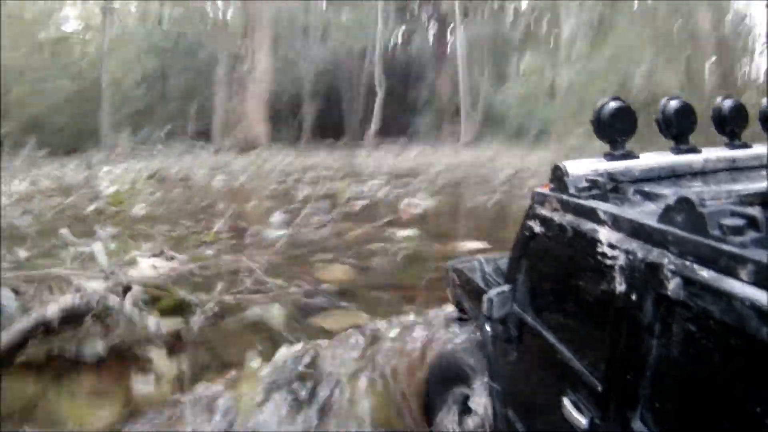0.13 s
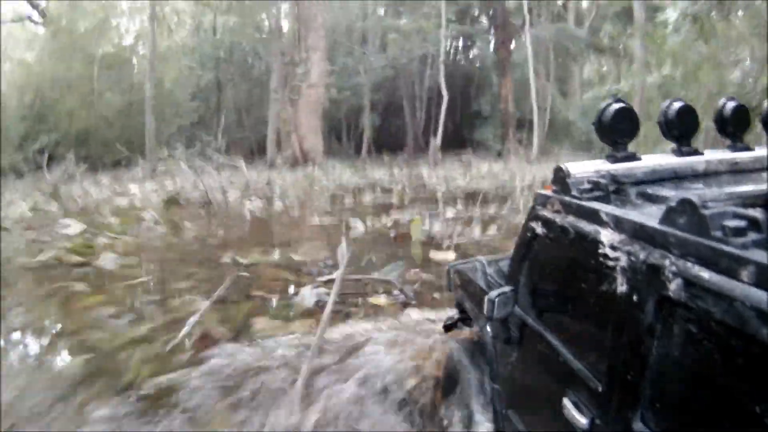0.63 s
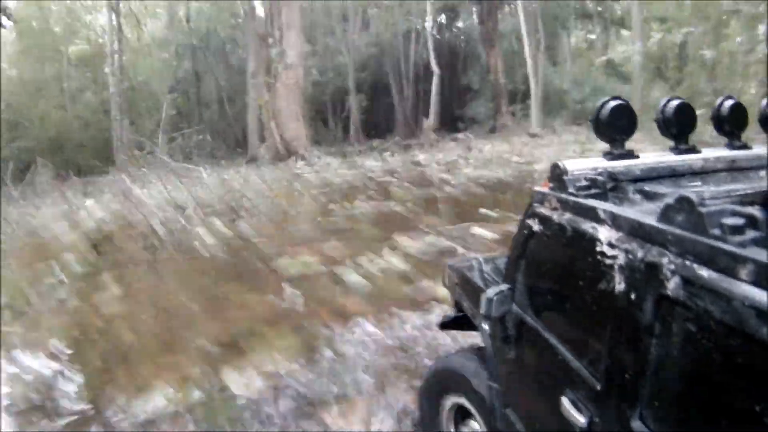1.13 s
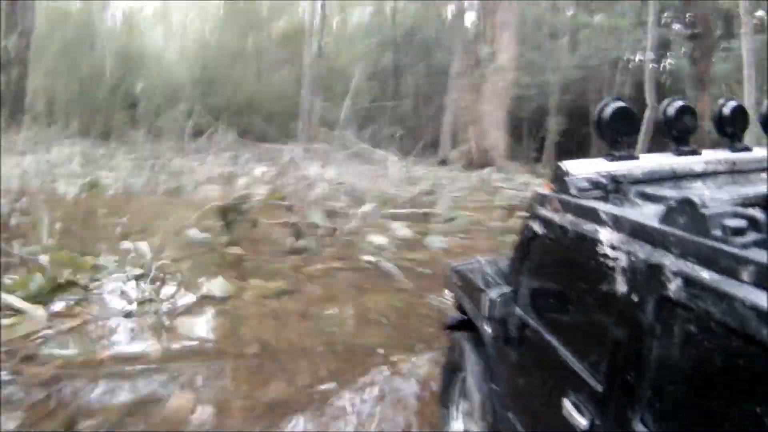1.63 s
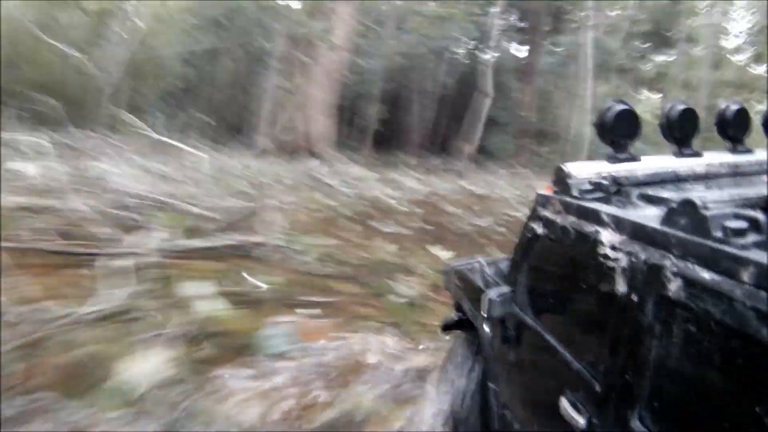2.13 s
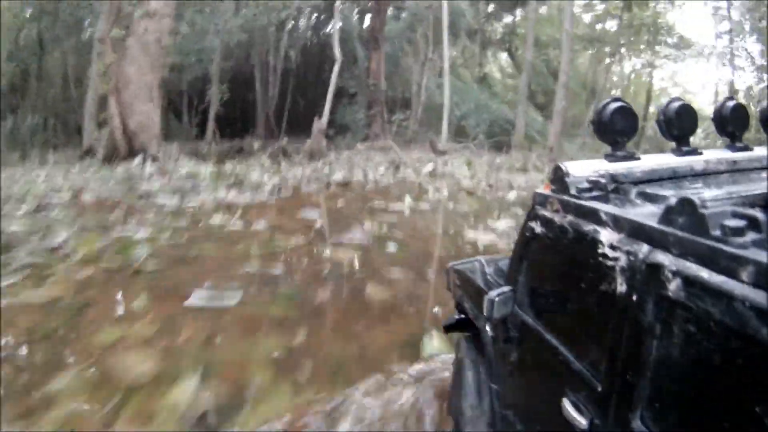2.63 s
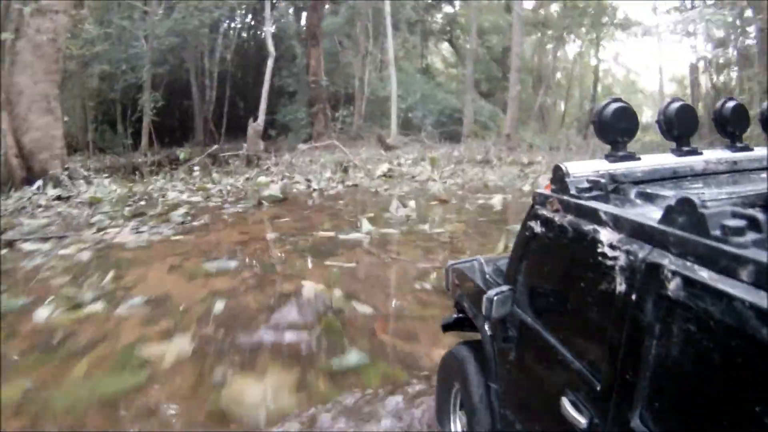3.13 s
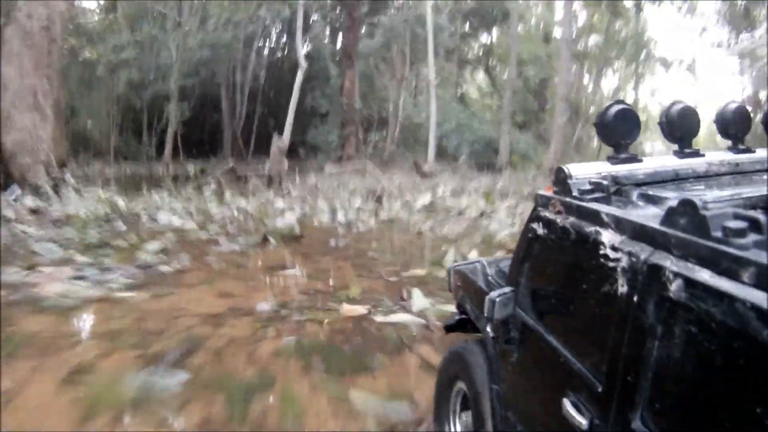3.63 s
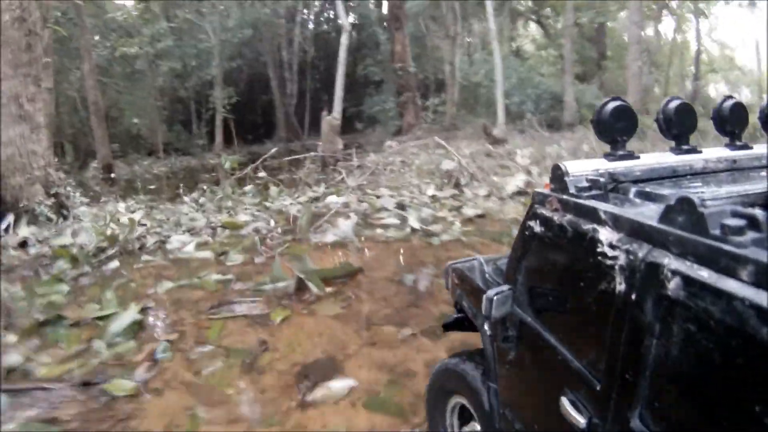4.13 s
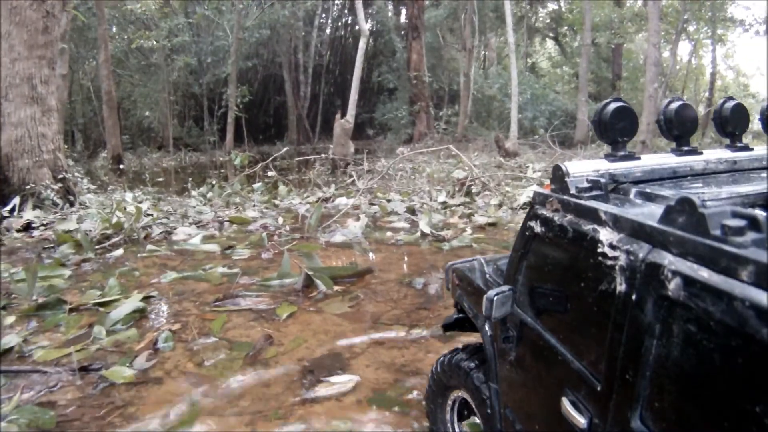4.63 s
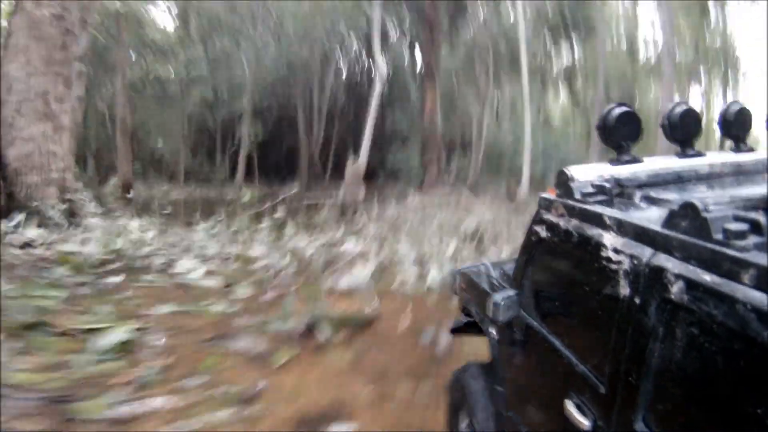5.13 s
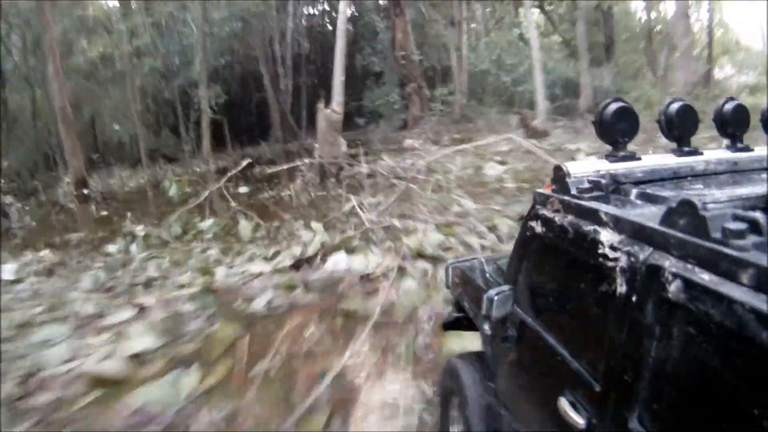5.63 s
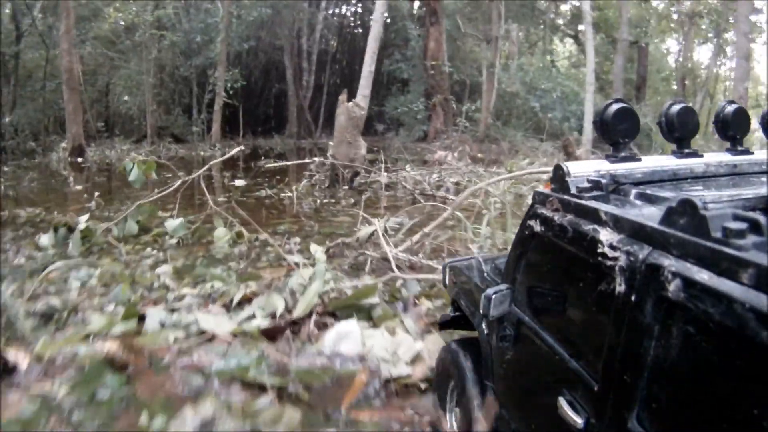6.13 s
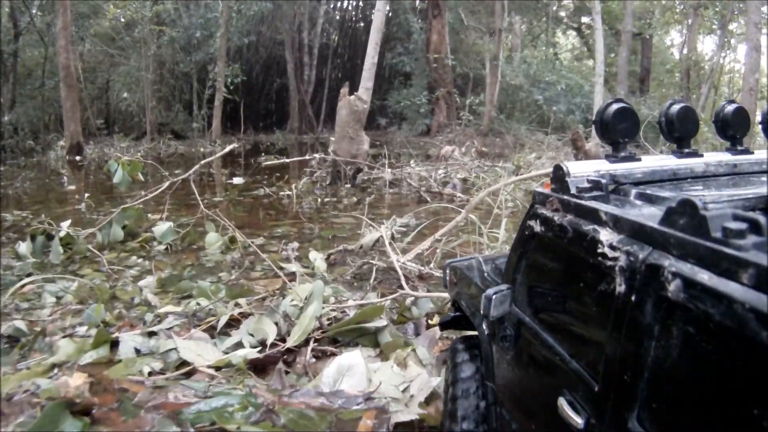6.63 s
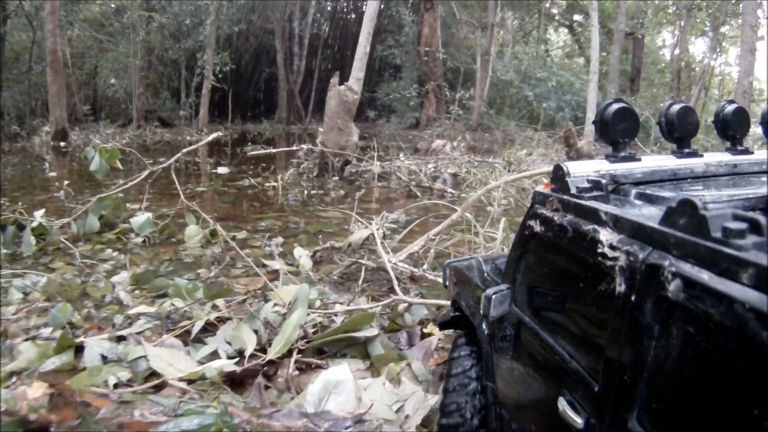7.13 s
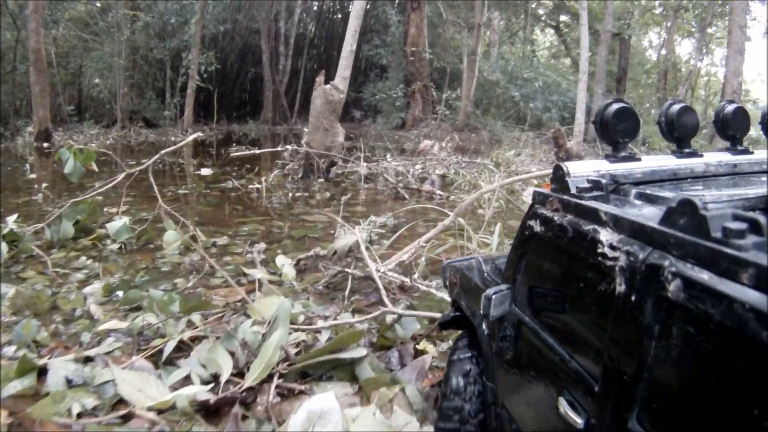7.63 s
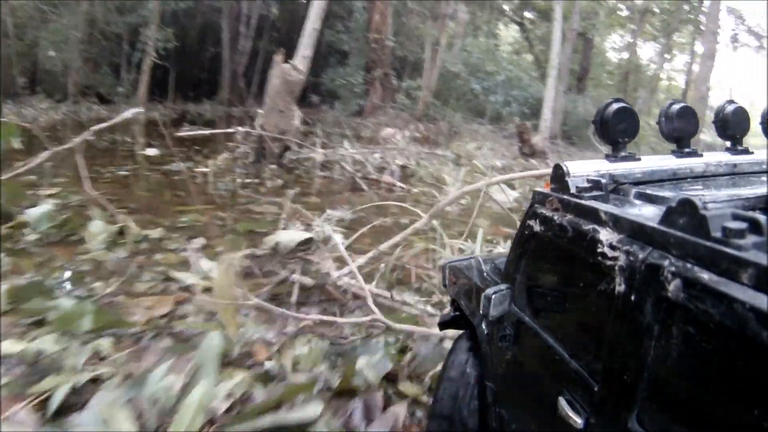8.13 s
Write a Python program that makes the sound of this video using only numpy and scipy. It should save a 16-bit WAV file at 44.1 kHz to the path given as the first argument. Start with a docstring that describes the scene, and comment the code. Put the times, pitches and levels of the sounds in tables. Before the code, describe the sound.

A small electric crawler whines and rattles through a puddle and wet leaves, with splashes and knocks, pauses, lurches with a hard bang, then nearly stops.

```python
"""Wet churning and rattling, a wavering gear whine, knocks, splashes, short squeals and low thuds of a swaying arm:
a small electric crawler drives through a puddle and wet leaves, heard from a closed camera case on its body.
Water and twigs strike the plastic shell, whose modes ring; gears are mesh tones through the same shell.
Drops are short noise bursts, the camera arm is narrow low noise, squeals and servo are plain tones.
The cheap recorder takes 12000 samples a second and holds each one, which mirrors the sound into the treble."""
import sys
import numpy as np
from scipy import signal
from scipy.fft import rfft, irfft, next_fast_len
from scipy.io import wavfile
from scipy.ndimage import uniform_filter1d

SR = 44100
rng = np.random.default_rng(int(sys.argv[2]) if len(sys.argv) > 2 else 0)


def volts_from_decibels(level):
    """Turn decibel levels (scalar or array-like) into linear amplitude factors."""
    exponent = np.asarray(level, float) / 20
    return 10 ** exponent


def master(y):
    """Save y as 16-bit WAV."""
    cut = np.clip(np.atleast_2d(y).T, -1, 1)
    pcm = np.round(cut * 32767)  # scale
    wavfile.write(sys.argv[1], SR, pcm.astype(np.int16))


N = 364707
TIME_S = np.arange(N) / SR

# Woods and electronics at rest. Each row: frequency in Hz, relative density in dB per Hz.
HUSH_COLOUR = [(47, -47), (80, -10), (174, -16.5), (605, -26.5), (868, -26), (1080, -45), (1520, -28.5),
               (3680, -37.5), (6000, -39), (7800, -76), (13200, -120)]
HUSH_RMS_DB = -63.5
# Steering servo holding the wheels. Each row: start in seconds, length in seconds, level in dB.
SERVO_HOLDS = [(5.085, 0.14, -74.5), (6.32, .15, -74), (6.55, 1.42, -76)]
SERVO_HZ = 5954
# Camera arm resonances: slow rock, bounce, flutter. Each row: frequency in Hz, width in Hz.
ARM_MODES = [(21, 18), (56, 12.6), (136, 32.2)]
# Bumps under the wheels shake the arm. Each row: time in seconds, slow rock in dB, bounce in dB, flutter in dB.
ARM_BUMPS = [(0, -20, -26.5, -36.5), (.16, -32, -21, -32.5), (.5, -22.5, -29.5, -39.5),
             (.68, -30.5, -31, -43), (.85, -25.5, -31.5, -37.5), (1.0, -32, -29, -54.5),
             (1.17, -27.5, -31.5, -41), (1.33, -35, -25, -65), (1.48, -19, -23.5, -36),
             (1.83, -20, -19, -38.5), (2.1, -20, -24.5, -36.5), (2.401, -22, -29.5, -40.5),
             (2.65, -22.5, -34, -38.5), (2.92, -28, -20.5, -43.5), (3.15, -29.5, -31.5, -49),
             (3.4, -25.5, -21, -42), (3.72, -27, -28, -44.5), (3.87, -28.5, -30, -46),
             (4.03, -38, -29.5, -55), (4.3, -31, -41, -50), (4.55, -43.5, -55.5, -70.5),
             (4.85, -47, -50, -81), (5.0, -82, -78, -87), (5.22, -32, -30, -44.5),
             (5.371, -22, -25.5, -31.5), (5.53, -44, -27.5, -68), (5.63, -21.5, -24.5, -39),
             (5.74, -48, -41, -40), (5.85, -22.5, -26.5, -45), (6.1, -42, -36.5, -52.5),
             (6.251, -33, -57, -53.5), (6.35, -54, -48, -58), (6.521, -41, -46, -52), (6.8, -61, -38, -56),
             (6.989, -39, -43, -58), (7.15, -47, -46, -51.5), (7.402, -48, -53.5, -65),
             (7.598, -57, -43.5, -56), (7.801, -50.5, -48, -52), (8.05, -35.5, -39, -47),
             (8.26, -40, -32, -60)]
BUMP_RISE_S, BUMP_FALL_S = 0.075, 0.13
# Drops on the camera case. Each row: start in seconds, strength in dB ahead of DROP_GAIN_DB.
CASE_DROPS = [(0.893, -31), (1.0273, -36), (1.044, -26), (1.7679, -32), (2.033, -35), (2.1325, -38),
              (2.2267, -32), (2.3456, -39), (2.4026, -33), (2.7152, -35), (2.768, -43), (2.832, -34),
              (2.8779, -34), (2.9083, -37), (3.3702, -37), (3.5228, -34), (3.5832, -39), (3.8082, -33),
              (3.976, -38), (4.315, -62), (5.2285, -31), (5.544, -27), (5.654, -35), (6.099, -38),
              (6.17, -52), (8.0634, -40)]
DROP_GAIN_DB, DROP_DECAY_S = 8.0, 0.0016
PATTER_DB, PATTER_PER_S = -25.5, 170  # small drops: median strength re contact level, rate
# Falling squeals as the wheels slip and the gears slow. Each row: start in seconds, start pitch in Hz, level in dB.
SLIP_SQUEALS = [(3.998, 966, -27), (4.1, 904, -30), (5.97, 950, -23.5), (6.09, 735, -35.5),
                (6.259, 918, -30.5), (6.42, 914, -36), (6.5, 898, -42), (6.55, 707, -46)]
SLIP_S, SLIP_SAG_SHARE = .07, .11  # length, share of pitch lost
# Shell resonances. Each row: frequency in Hz, width in Hz, relative gain in dB.
SHELL_MODES = [(280, 12, -20), (412, 32.5, -12.5), (660.4, 27.3, 2), (899.2, 45.8, 5), (1072, 28.6, 3.5),
               (1210, 122, -2), (1503.6, 95.3, 0.5), (1640, 214, -5.5), (1850, 280, -7), (2056, 56, -7),
               (2256, 129, -8.5), (2450, 154, -10.5), (2902, 240, -20.5), (3368, 170, -19.5),
               (3708, 118, -14), (4360, 100, -26.5), (4930, 970, -35.5)]
# Twigs and stones against the shell; near 4.7-4.9 s faint pitched blips, perhaps a bird or the motor.
# Each row: start in seconds, strength in dB, pitch in Hz, high modes in dB.
SHELL_KNOCKS = [(0.741, -17, 1470, -28), (0.841, -16, 1450, -28), (1.029, -3, 1905, -34),
                (1.044, -21, 1850, -4.5), (1.278, -21.5, 910, 1), (1.704, -17.5, 1467, -15),
                (2.083, -35, 1340, -29), (2.163, -11, 841, -10.5), (2.219, -14.5, 1365, -20),
                (3.435, -20, 890.4, -30), (3.608, -17, 1443, -39), (3.669, -14, 1542, -23),
                (4.003, -24, 850, -30), (4.063, -18.5, 1498, -18), (4.134, -25, 864, -57),
                (4.189, -18.5, 853, -33), (4.459, -48, 1510, -28), (4.725, -51, 875, -20),
                (4.792, -61, 1500, -20), (4.872, -51, 1510, -20), (5.097, -47, 893, -21),
                (5.128, -33, 893, -21), (5.211, -16.5, 1410, -13), (5.23, -18.5, 1760, -9),
                (5.65, 8, 1247, -21.5), (5.746, -12, 1420, -22), (6.097, -14, 1900, 5),
                (6.129, -33.5, 900, 12.5), (6.171, -1, 2214, -17), (6.248, -17.5, 2280, -30),
                (6.395, -29, 915, -26), (6.498, -32, 833, -30), (6.605, -38, 860, -34),
                (6.77, -47.5, 955, -30), (6.89, -41, 1520, -34), (6.958, -29, 1770, -3.5),
                (7.009, -40, 1450, -15), (7.049, -39.5, 1280, -10), (7.403, -40.5, 1930, -22),
                (7.709, -44, 970, -8), (7.93, -40, 900, -20)]
RING_S, RING_SLOPE = .06, 1.1  # t60 at 1 kHz ahead of extra damping; higher spots die faster by this power
HARD_BLOW_DB = 1  # blows near this strength are damped by what struck them
# Gear teeth meeting, one list for each spell of driving.
# Each row: time in seconds, mesh rate in Hz ahead of sag and waver, drive in dB.
MESH_SPELLS = [
    [(0, 2630, -24.5), (.28, 3065, -18.5), (.55, 3000, -22.5), (.68, 2600, -22.5), (.85, 2330, -31.5),
     (1.06, 1950, -21.5), (1.25, 1991, -24.5), (1.45, 2030, -23), (1.68, 2030, -26), (1.85, 2310, -32.5),
     (2.28, 2050, -31.5), (2.45, 2270, -29.5), (2.56, 2114, -27), (2.66, 2302, -30.5), (2.8, 2124, -25),
     (2.95, 2010, -31), (3.06, 1816, -28), (3.18, 1590, -37), (3.3, 1530, -28.5), (3.58, 1573, -28.5),
     (3.65, 1930, -23.5), (3.72, 2450, -28.5), (3.84, 2850, -27), (3.95, 2260, -56), (4.1, 1651, -29),
     (4.3, 1494, -44.5)],
    [(5.17, 1105, -52), (5.2, 1295, -35), (5.22, 1800, -19), (5.25, 1894, -24.5), (5.27, 2260, -25),
     (5.3, 2510, -27), (5.33, 3200, -19), (5.38, 3907, -35)],
    [(7.93, 620, -49), (8.02, 688, -41), (8.06, 875, -37), (8.1, 1060, -46), (8.18, 1104, -51),
     (8.27, 1150, -38)],
]
PINION_TEETH = 13
# Load on the gears dips the pitch briefly, about once per wheel turn.
# Each row: time in seconds, share of rate lost.
GEAR_SAGS = [(.12, 0.064), (.44, 0.11), (.64, .08), (.8, .07), (.97, .08), (1.246, .09), (1.47, .08),
             (1.712, .1), (1.841, .1), (1.959, .1), (2.1, .08), (2.52, .08), (2.631, .08), (2.85, .07),
             (3.07, .07), (3.361, 0.058), (3.56, .05)]
SAG_S = .018
# Churn through water and leaves. Each row: time in seconds, contact level in dB, spray brightness in dB.
CHURN_COURSE = [(0, -23, -2.5), (.6, -25, 1), (1.0, -26, 1), (1.7, -26.5, -2), (2.1, -27, 0.5),
                (2.45, -26.5, 0), (3.1, -27, -3.5), (3.55, -29.5, -6), (3.8, -24.5, -0.5), (4.0, -30, -4),
                (4.3, -32.5, -15), (4.42, -49, -12), (4.56, -71, 17), (5.07, -80, 18.5), (5.1, -52.5, -41),
                (5.2, -28, -4), (5.33, -26.5, 1), (5.64, -26, 2), (5.72, -21, -2), (5.8, -17, -0.5),
                (5.93, -24.5, -1), (6.08, -28, -4), (6.22, -29, 0), (6.33, -33, -0.5), (6.45, -38.5, -1),
                (6.7, -56, -6), (6.85, -60.5, 4), (6.92, -54.5, 2), (7.1, -53, -3), (7.36, -61, 0),
                (7.55, -64.5, 9), (7.78, -44, -10.5), (7.9, -59, -12), (7.97, -42, -5.5), (8.27, -35, -3.5)]
RUMBLE_DB = -20.5  # re contact level
MID_SHARE = 0.44  # mids brighten by this share of the spray brightness
# Splashes and scrapes along the shell. Each row: start in seconds, length in seconds, level in dB.
SHELL_SPLASHES = [(0, 0.004, -22), (.742, 0.005, -21), (2.082, 0.004, -25), (2.15, 0.08, -26),
                  (3.668, 0.0048, -32), (4.006, 0.019, -47), (4.135, 0.017, -44), (4.187, 0.0097, -31.5),
                  (4.37, 0.017, -46), (4.724, .02, -63), (4.76, 0.116, -65), (5.208, 0.027, -30),
                  (5.31, 0.054, -29), (5.375, 0.017, -17), (5.4, .04, -10.5), (5.45, 0.033, -17),
                  (5.51, 0.0044, -17.5), (5.525, 0.049, -14.5), (5.61, 0.014, -28), (5.745, 0.01, -33),
                  (6.105, .03, -26), (6.185, .025, -21.5), (6.25, 0.031, -36.5), (7.16, 0.036, -57),
                  (7.32, .02, -56)]
SPLASH_ATTACK_S, SPLASH_RELEASE_S = 0.0057, 0.0044
SPLASH_LOW_DB, SPLASH_MID_DB, SPLASH_HIGH_DB = -1, 1.5, -1  # colour of a splash
# Wheels strain against branches, low shell modes hum. Each row: start in seconds, length in seconds, level in dB.
WHEEL_STRAINS = [(6.5, 1.357, -50), (7.96, .32, -42.5)]
CEILING_DB, RECOVERY_DB_PER_S, REACTION_S = -4, 20.5, 0.0029  # gain control
HELD_SAMPLES, TOP_HZ = 4, 15250  # recorder


def level(x, db):
    """Scale to an rms level."""
    return x * volts_from_decibels(db) / np.sqrt(np.mean(x ** 2))


def curves(tables):
    """Join tables end to end; one row of samples for each column after time."""
    s, *columns = np.concatenate(tables).T
    return [np.interp(TIME_S, s, column) for column in columns]


def walk(rate_hz):
    """Random levels held 1 / rate_hz seconds and slewed twice; spread 1."""
    k = int(SR / rate_hz)
    held = np.repeat(rng.standard_normal(N // k + 1), k)
    x = uniform_filter1d(uniform_filter1d(held, k), k)[:N]
    return x / x.std()


def band(x, lo_hz, hi_hz):
    """Band-pass."""
    return signal.sosfilt(signal.butter(2, [lo_hz, hi_hz], "band", fs=SR, output="sos"), x)


def spells(rows, attack_s, release_s):
    """Sum of envelopes: linear attack ending at the start time, hold, exponential release."""
    envelope = np.zeros(N)
    for start_s, length_s, db in rows:
        attack = np.clip((TIME_S - start_s) / attack_s + 1, 0, 1)
        release = np.exp(-np.maximum(TIME_S - start_s - length_s, 0) / release_s)
        envelope += volts_from_decibels(db) * attack * release
    return envelope


def shell(x):
    """Ring the shell's modes as decaying sines; neighbours move in opposite sense."""
    t = np.arange(4096) / SR
    ring = np.zeros(len(t))
    for k, (hz, width_hz, db) in enumerate(SHELL_MODES):
        decay = width_hz * np.exp(-np.pi * width_hz * t)
        ring += (-1) ** k * volts_from_decibels(db) * decay * np.sin(2 * np.pi * hz * t)
    return signal.fftconvolve(x, ring * 2 * np.pi / SR)[:len(x)]


def hush():
    """Faint steady hiss: noise given a fixed spectrum."""
    hz, db = np.transpose(HUSH_COLOUR)
    bin_hz = np.fft.rfftfreq(N, 1 / SR)
    colour = volts_from_decibels(np.interp(np.log(bin_hz + 1), np.log(hz), db))
    return level(irfft(rfft(rng.standard_normal(N)) * colour, N), HUSH_RMS_DB)


def servo():
    """The steering servo sings one thin, unsteady tone while it holds the wheels."""
    holds = spells(SERVO_HOLDS, 0.068, .015) * volts_from_decibels(0.73 * walk(59))
    return holds * np.sin(2 * np.pi * SERVO_HZ * TIME_S)


def rumble():
    """Tyres shake the whole frame: a broad low shudder that follows the churning."""
    contact_db, _ = curves([CHURN_COURSE])
    shudder = level(band(rng.standard_normal(N), 68, 190), -0.12)
    return volts_from_decibels(contact_db + RUMBLE_DB + 2.7 * walk(9)) * shudder


def sway():
    """Bumps keep each arm mode swinging; the swing is steadier than plain noise."""
    out = np.zeros(N)
    coarse_s = np.arange(0, N + 64, 64) / SR
    bump_s, *strengths = np.transpose(ARM_BUMPS)
    late_s = coarse_s[:, None] - bump_s
    shape = np.exp(-np.where(late_s < 0, (late_s / BUMP_RISE_S) ** 2, late_s / BUMP_FALL_S))
    for (hz, width_hz), db in zip(ARM_MODES, strengths):
        noise = band(rng.standard_normal(N), hz - width_hz / 2, hz + width_hz / 2)
        swing = signal.hilbert(noise, next_fast_len(N))[:N]
        steady = swing.real / np.abs(swing) ** 0.68  # flattens the envelope
        steady = band(steady, hz - 0.88 * width_hz, hz + 1.13 * width_hz)
        strength = np.interp(TIME_S, coarse_s, shape @ volts_from_decibels(db))
        out += strength * level(steady, -.3)
    return out


def drops():
    """Short dry noise spatters: listed big ones, random small ones that follow the contact level."""
    contact_db, _ = curves([CHURN_COURSE])
    scatter_db = 5 * rng.standard_normal(N)
    ticks = (rng.random(N) < PATTER_PER_S / SR) * volts_from_decibels(contact_db + PATTER_DB + scatter_db)
    start_s, db = np.transpose(CASE_DROPS)
    ticks[(start_s * SR).astype(int)] = volts_from_decibels(db)
    spatter = signal.lfilter([1], [1, -np.exp(-1 / (DROP_DECAY_S * SR))], ticks)
    return band(spatter * rng.standard_normal(N), 2700, 9000) * volts_from_decibels(DROP_GAIN_DB)


def slips():
    """Each squeal is a sine that swells, sags in pitch and fades."""
    out = np.zeros(N)
    u = np.arange(int(SLIP_S * SR)) / (SLIP_S * SR)  # 0 to 1 along the squeal
    for start_s, hz, db in SLIP_SQUEALS:
        i = int(start_s * SR)
        phase = 2 * np.pi * np.cumsum(hz * (1 - SLIP_SAG_SHARE * u)) / SR
        out[i:i + len(u)] += volts_from_decibels(db) * np.sin(np.pi * u ** .6) * np.sin(phase)
    return out * volts_from_decibels(1.5 * walk(60))


def knocks():
    """A blow rings the shell around its pitch, with a tone at the struck spot; hard contacts add high modes."""
    out = np.zeros(N + 4096)
    t = np.arange(4096) / SR
    for start_s, db, hz, hard_db in SHELL_KNOCKS:
        ring = shell(rng.standard_normal(len(t)) * np.exp(-t / .002))
        spot = np.sin(2 * np.pi * hz * t) * (1 - np.exp(-t / .0008))
        parts = [spot, band(ring, .6 * hz, 2.2 * hz), band(ring, 2560, 4200)]
        damping = 1 + 0.14 * volts_from_decibels(hard_db) + volts_from_decibels(db - HARD_BLOW_DB)
        fade = np.exp(-np.log(1000) * t * (hz / 1000) ** RING_SLOPE / RING_S * damping)
        spot, near, high = (fade * p / np.abs(fade * p).max() for p in parts)
        blow = 0.63 * spot / (1 + volts_from_decibels(hard_db - 1.0)) + 0.8 * near + volts_from_decibels(hard_db) * high
        i = int(start_s * SR)
        out[i:i + len(t)] += volts_from_decibels(db) * blow
    return out[:N]


def whine():
    """Worn teeth waver the mesh tone; an eccentric pinion adds a tone a turn above and below, flaring separately."""
    hz, drive_db = curves(MESH_SPELLS)
    sag = sum(share * np.exp(-((TIME_S - s) / SAG_S) ** 2) for s, share in GEAR_SAGS)
    waver = np.maximum(hz / 2000, 1) * (.009 * walk(30) + .017 * walk(110))
    phase = 2 * np.pi * np.cumsum(hz * (1 - sag + waver)) / SR
    turn = phase / PINION_TEETH
    tone = sum(volts_from_decibels(3.5 * walk(90) - 8 * abs(k)) * np.sin(phase + k * turn) for k in (-1, 0, 1))
    # every second tooth is stronger, and the teeth strike hard enough for an octave
    tone += volts_from_decibels(3 * walk(60) - 14) * np.sin(phase / 2)
    tone += volts_from_decibels(3 * walk(60) - 10) * np.sin(2 * phase)
    running = sum((TIME_S > m[0][0]) & (TIME_S < m[-1][0]) for m in MESH_SPELLS)
    return shell(tone * running * volts_from_decibels(drive_db + 2 * walk(40) + 2.5 * walk(70)))


def rattle():
    """Dense small contacts in uneven flurries ring the shell; four bands follow churn, splashes and strain."""
    contact_db, bright_db = curves([CHURN_COURSE])
    strength_db = 2.6 * np.minimum(rng.exponential(size=N), 6)
    contacts = rng.standard_normal(N) * (rng.random(N) < 5000 / SR) * volts_from_decibels(strength_db)
    flurries = volts_from_decibels(0.27 * walk(14) + 1.4 * walk(40))
    ring = level(shell(contacts * flurries), -0.34)
    churn = volts_from_decibels(contact_db)
    splash = spells(SHELL_SPLASHES, SPLASH_ATTACK_S, SPLASH_RELEASE_S)
    strain = spells(WHEEL_STRAINS, .1, .03) * volts_from_decibels(2.5 * walk(11))
    low = volts_from_decibels(-2.2) * churn + volts_from_decibels(SPLASH_LOW_DB) * splash + strain
    body = churn + splash
    mid = volts_from_decibels(MID_SHARE * bright_db) * churn + volts_from_decibels(SPLASH_MID_DB) * splash
    high = (volts_from_decibels(bright_db) * churn + volts_from_decibels(SPLASH_HIGH_DB) * splash) * volts_from_decibels(1.42 * walk(18))
    return (low * band(ring, 160, 734) + body * band(ring, 776, 1071)
            + mid * band(ring, 1127, 2297) + high * band(ring, 2720, 5600))


def scene():
    """Everything reaches one microphone."""
    background = hush() + servo() + rumble() + sway()
    return (background + drops() + slips() + knocks() + whine() + rattle())[None]


def gain_control(x):
    """A peak over the ceiling pulls the gain down a moment later; it creeps back at a steady rate in dB."""
    creep_db = RECOVERY_DB_PER_S * TIME_S
    peak_db = 20 * np.log10(np.abs(x[0]) + 1e-9)
    over_db = np.maximum.accumulate(peak_db + creep_db) - creep_db - CEILING_DB
    k = int(REACTION_S * SR)
    delayed_db = np.maximum(np.r_[np.zeros(k), over_db[:-k]], 0)
    return x * volts_from_decibels(-uniform_filter1d(delayed_db, k))


def band_limit(x):
    """A steep low-pass at the top of the band."""
    return signal.sosfilt(signal.butter(12, 16460, fs=SR, output="sos"), x)


def record(dry):
    """Gain control, 12 kHz sampling, clipping, each sample held four times at 48 kHz, final rate, low-pass."""
    slow = signal.resample_poly(gain_control(dry), 40, 147, axis=1, padtype="edge")
    slow = np.clip(slow, -.5, .5)
    held = np.repeat(slow, HELD_SAMPLES, axis=1)
    mix = signal.resample_poly(held, 147, 160, axis=1, padtype="edge")[:, :N]
    mix = signal.sosfilt(signal.ellip(8, .2, 45, TOP_HZ, fs=SR, output="sos"), mix)
    return band_limit(mix)


dry = scene()
out = record(dry)
master(out)
```